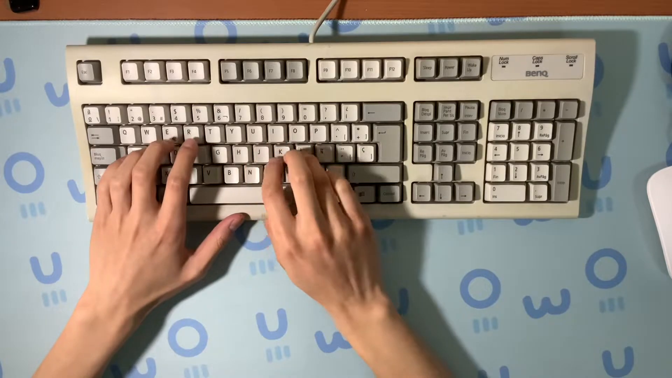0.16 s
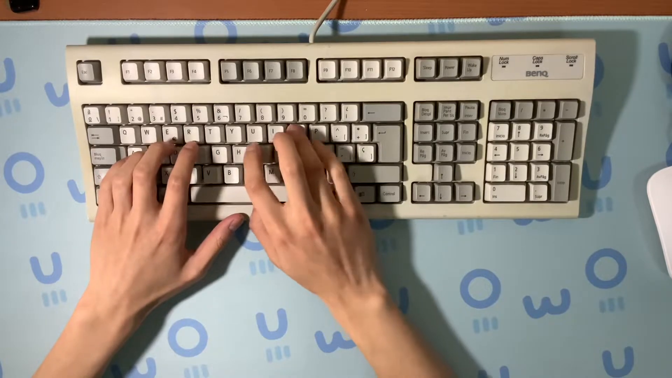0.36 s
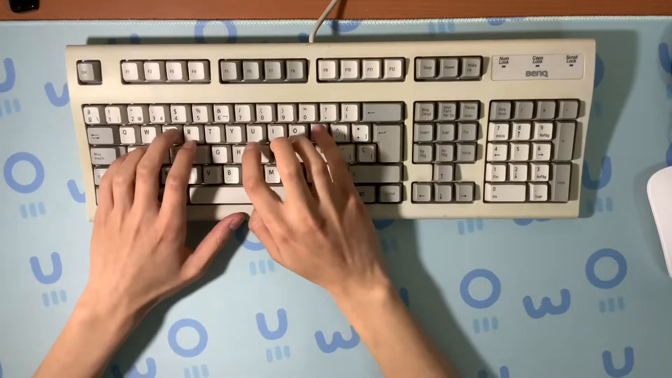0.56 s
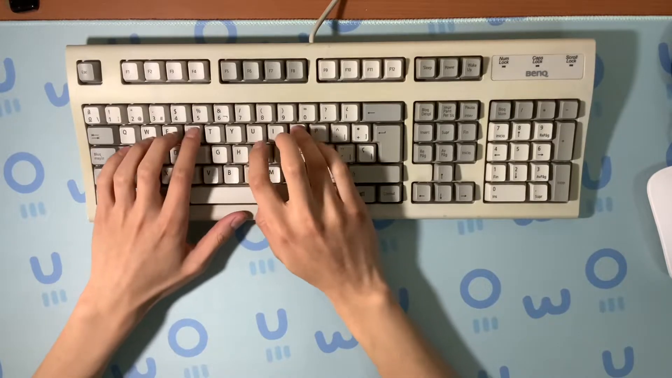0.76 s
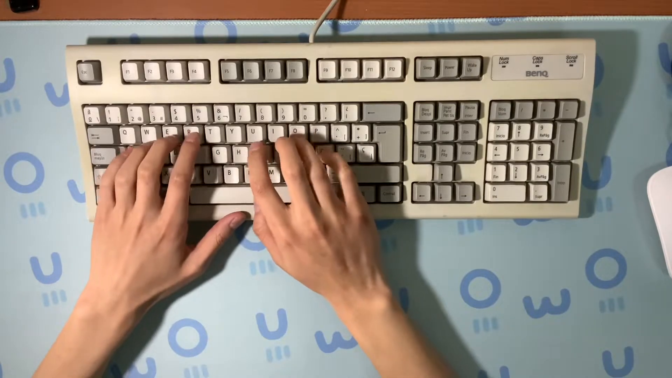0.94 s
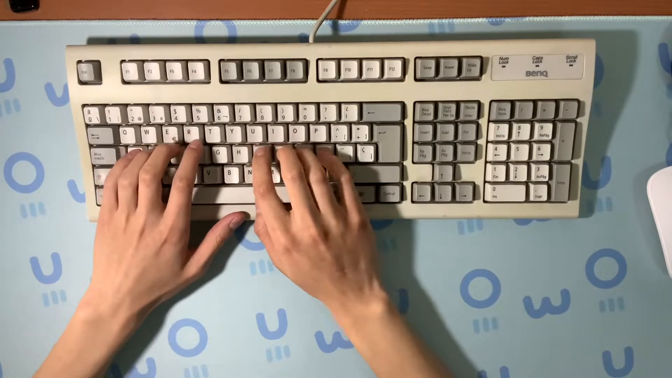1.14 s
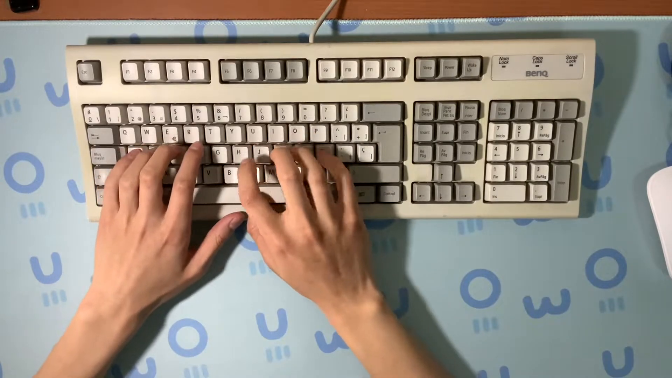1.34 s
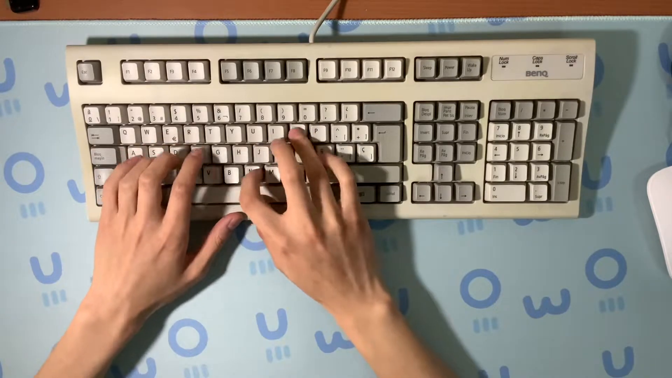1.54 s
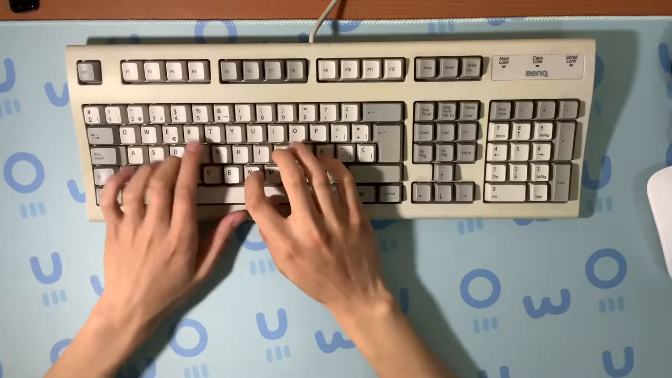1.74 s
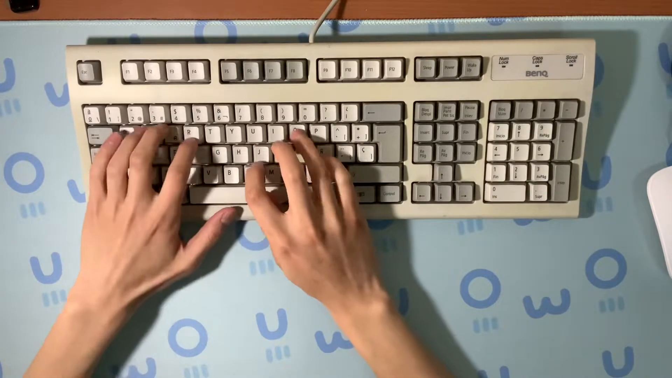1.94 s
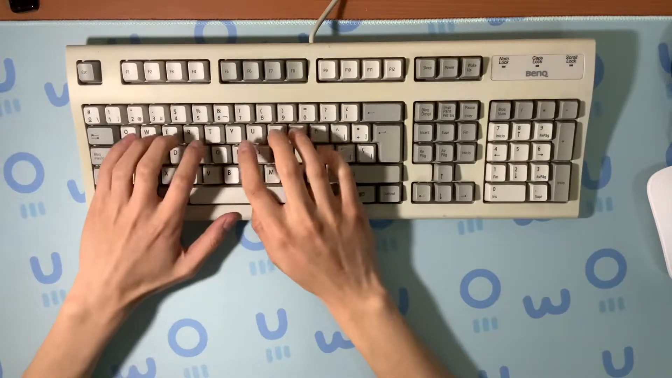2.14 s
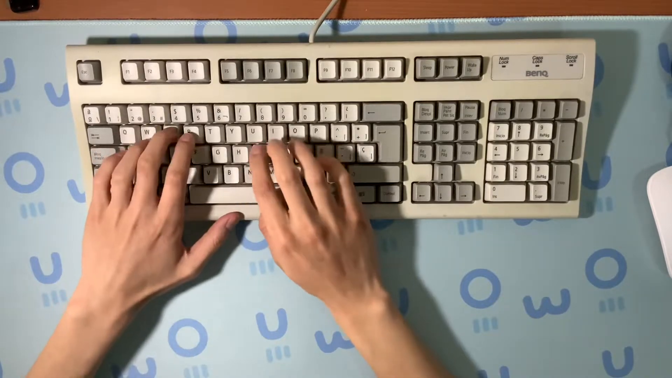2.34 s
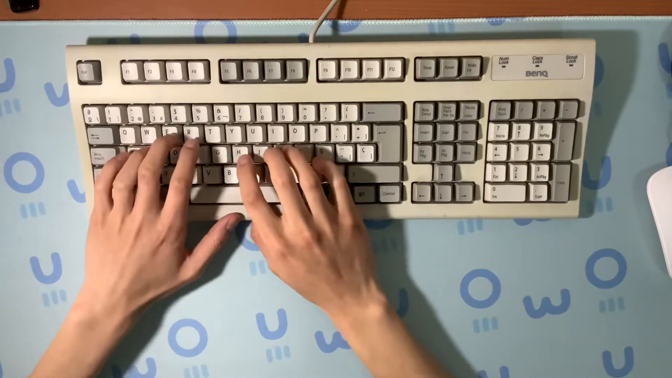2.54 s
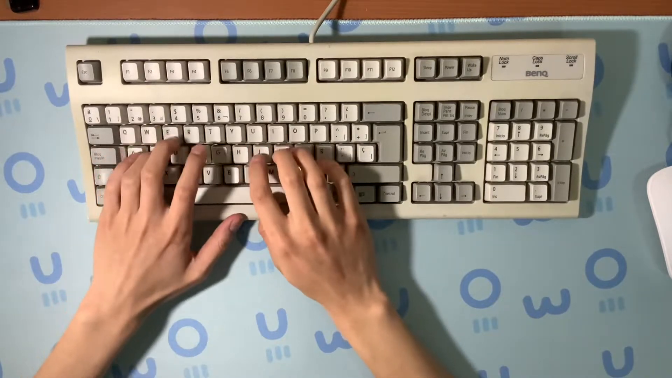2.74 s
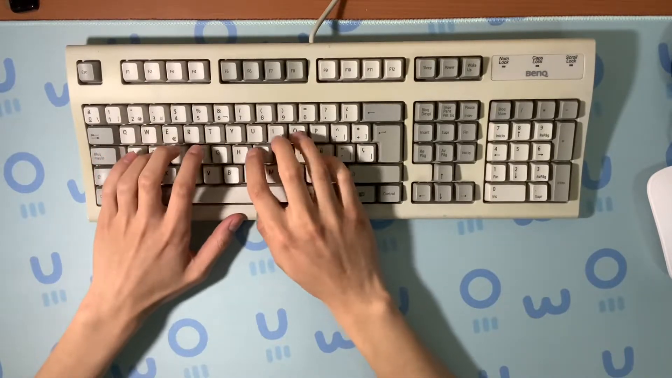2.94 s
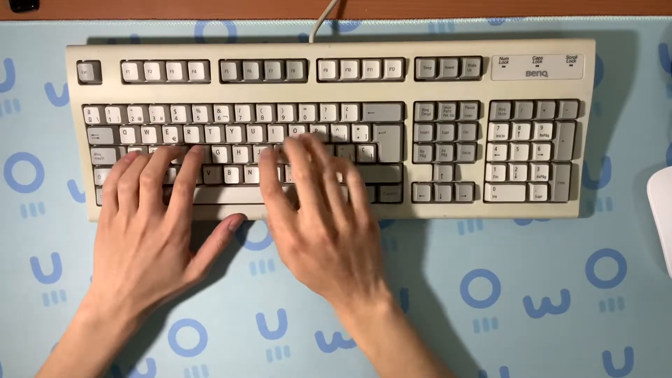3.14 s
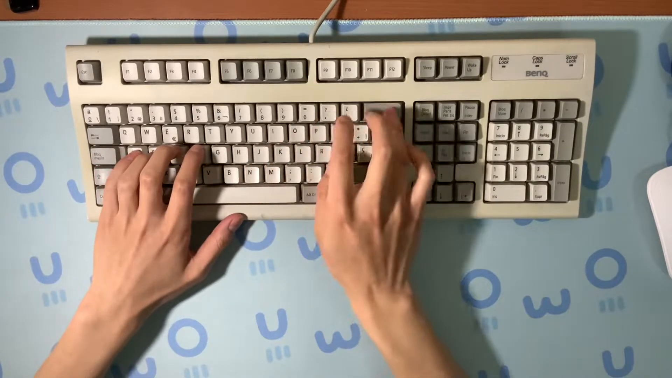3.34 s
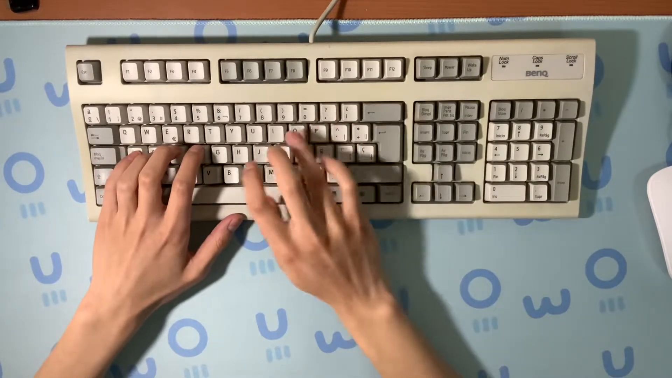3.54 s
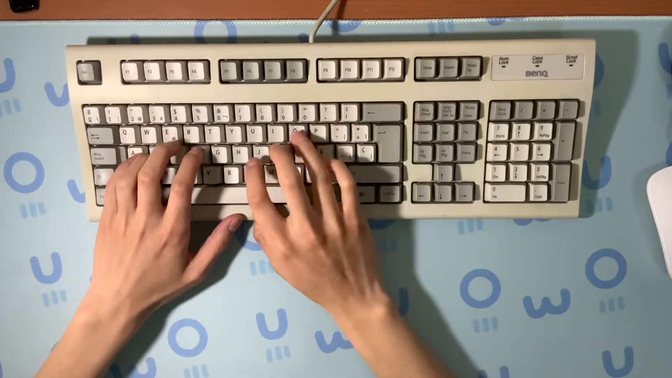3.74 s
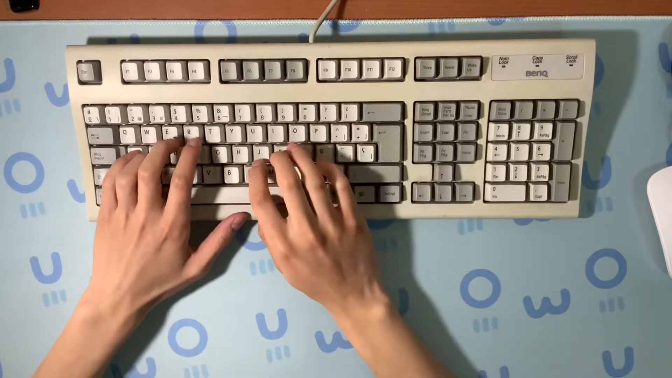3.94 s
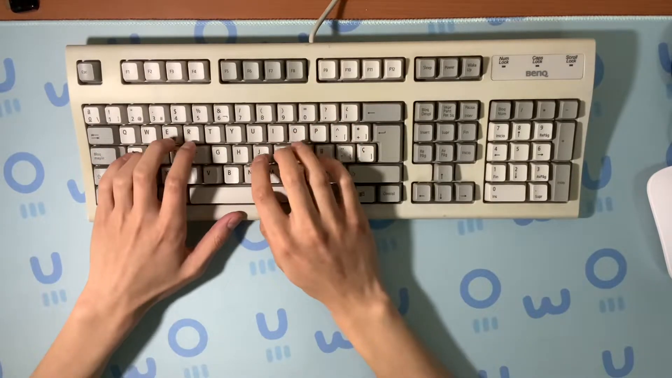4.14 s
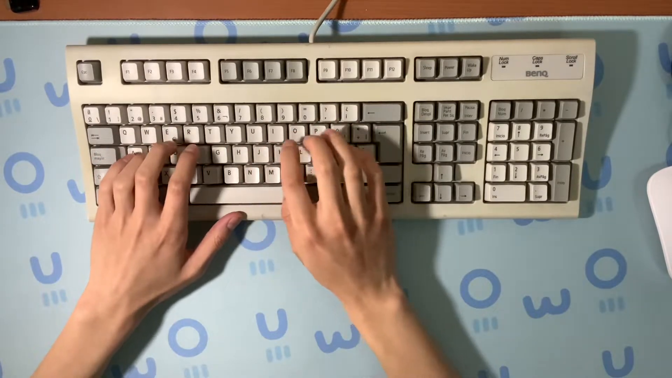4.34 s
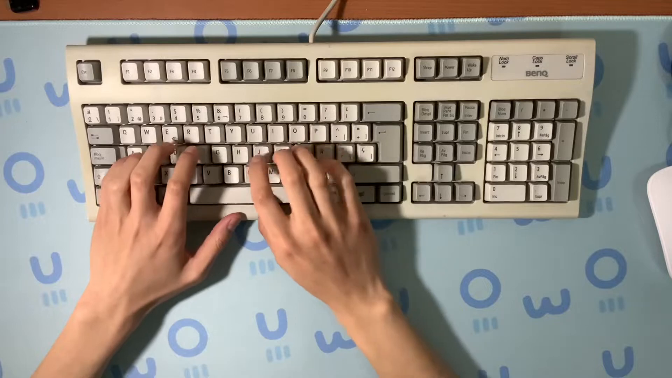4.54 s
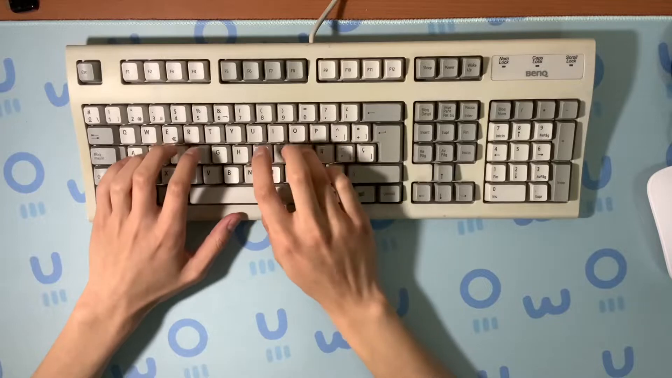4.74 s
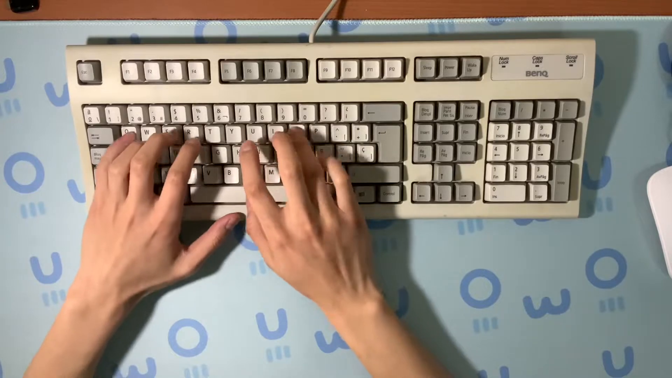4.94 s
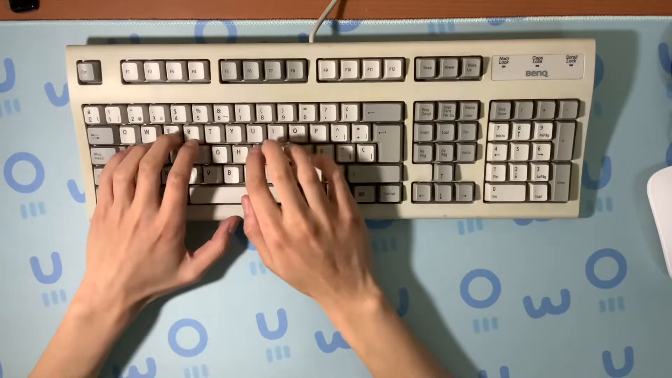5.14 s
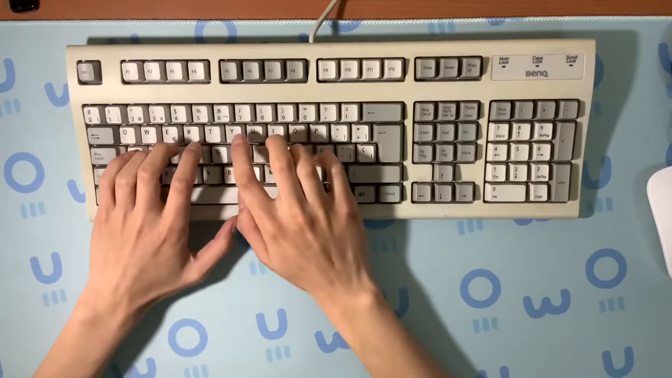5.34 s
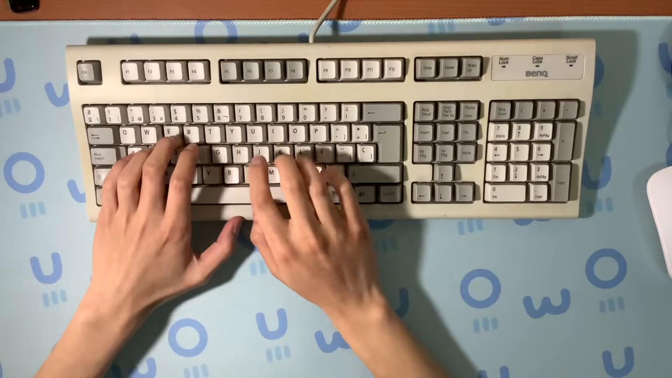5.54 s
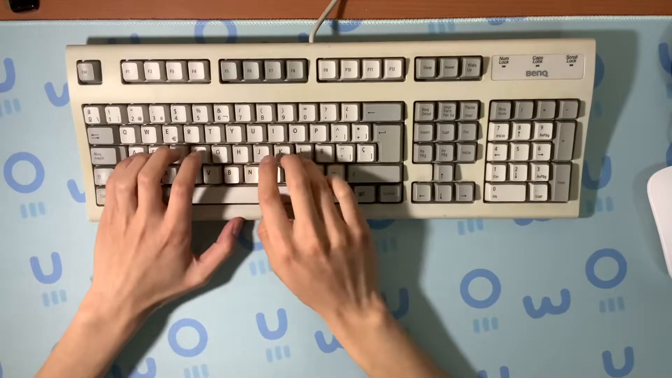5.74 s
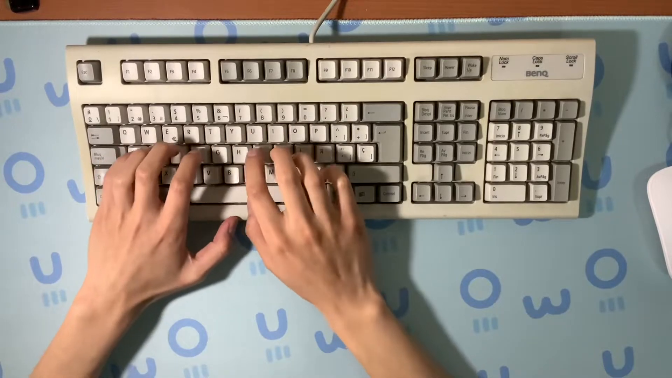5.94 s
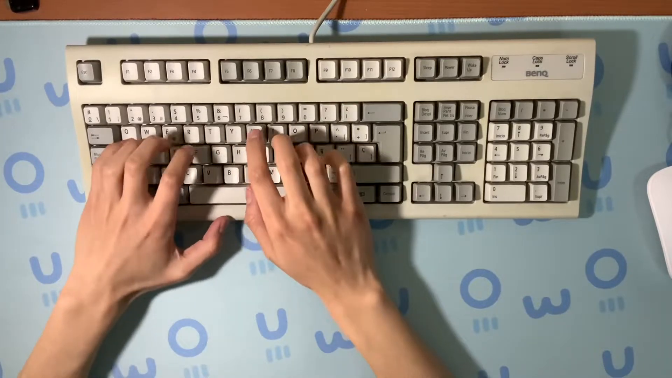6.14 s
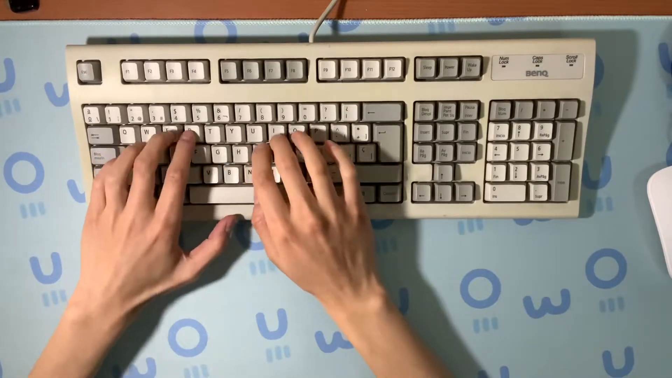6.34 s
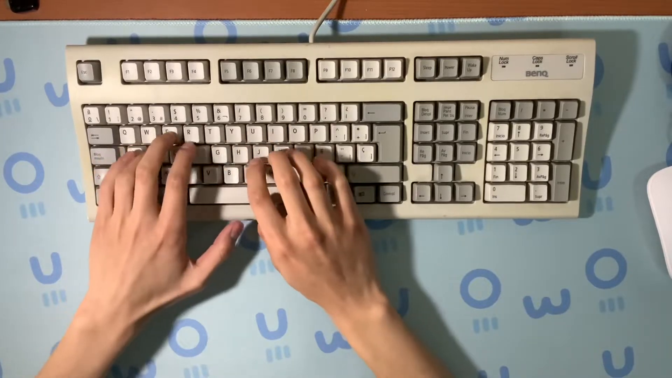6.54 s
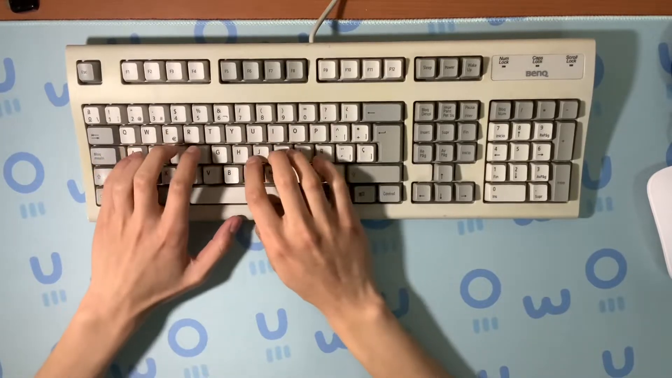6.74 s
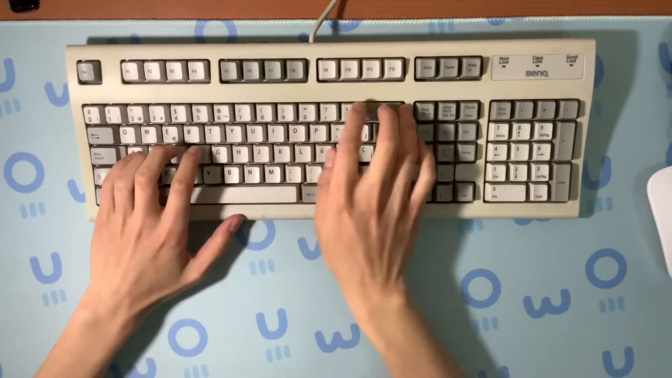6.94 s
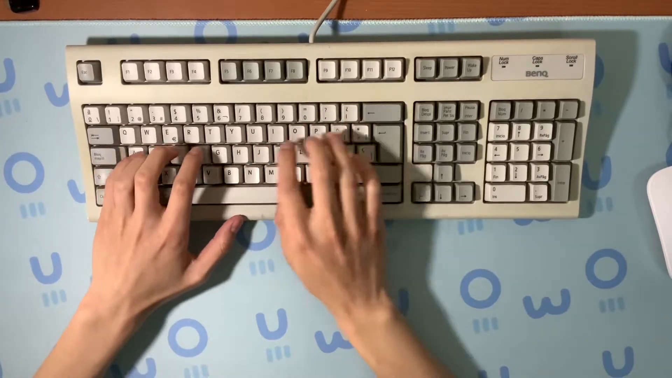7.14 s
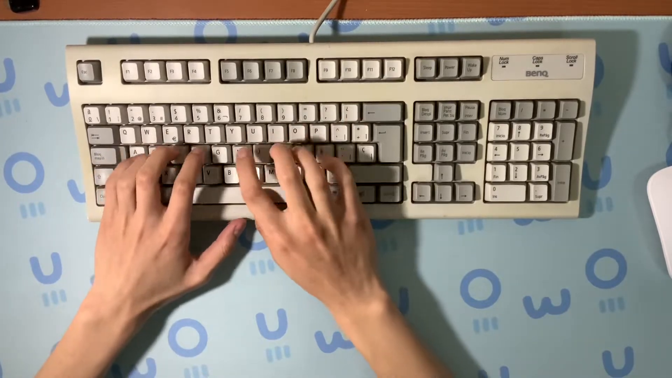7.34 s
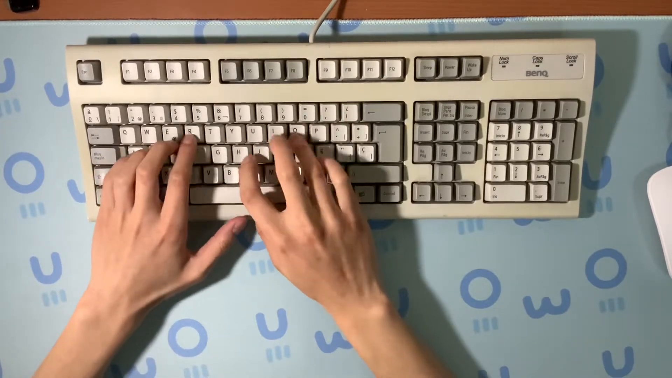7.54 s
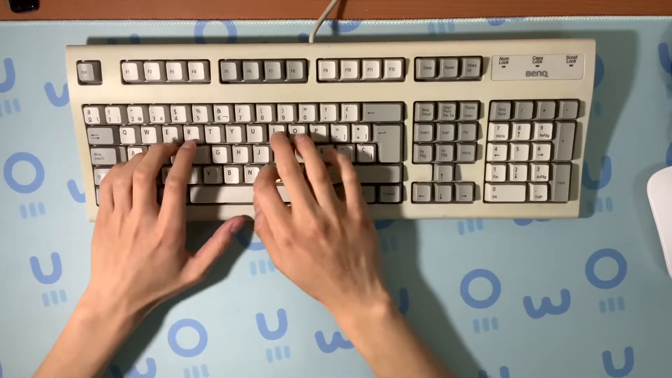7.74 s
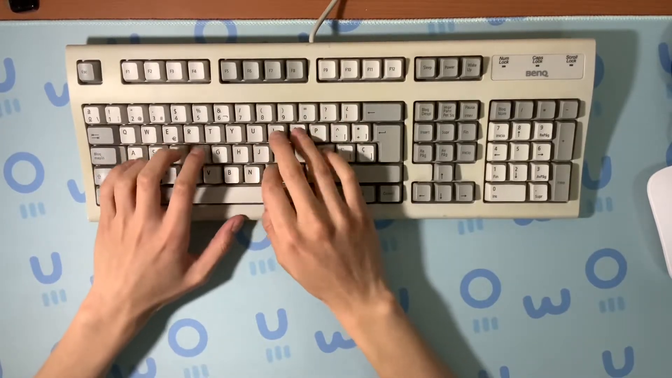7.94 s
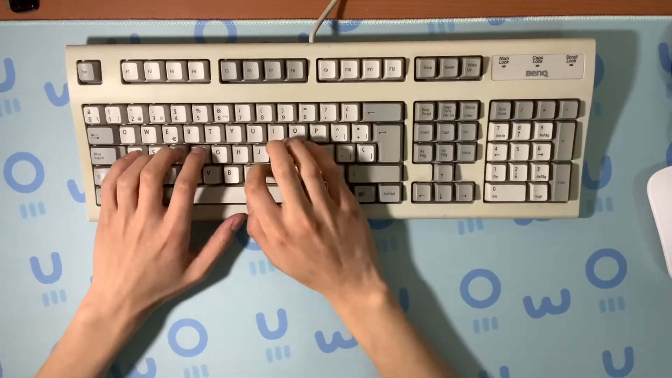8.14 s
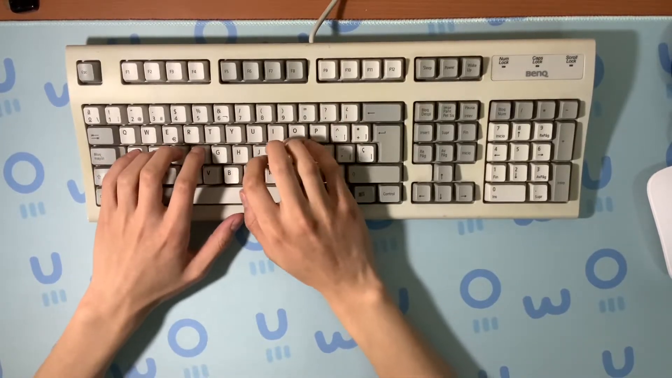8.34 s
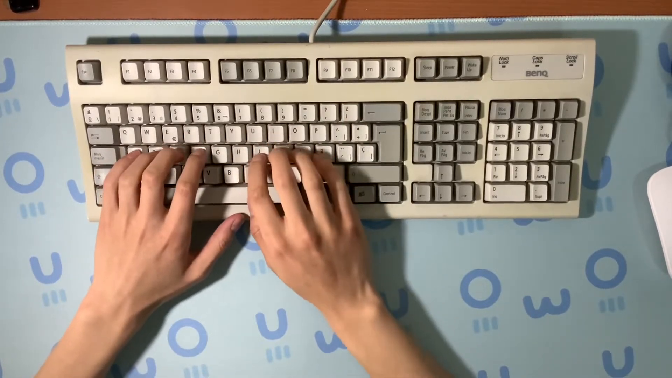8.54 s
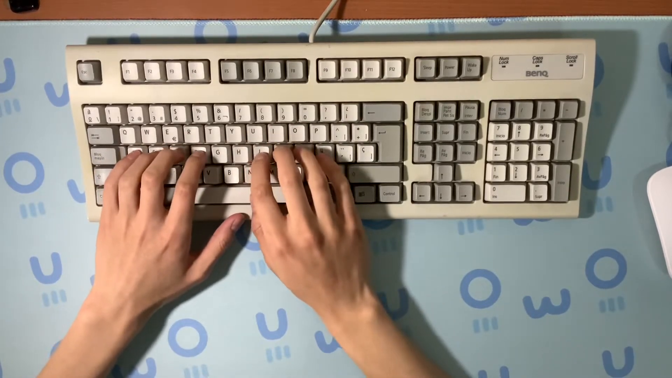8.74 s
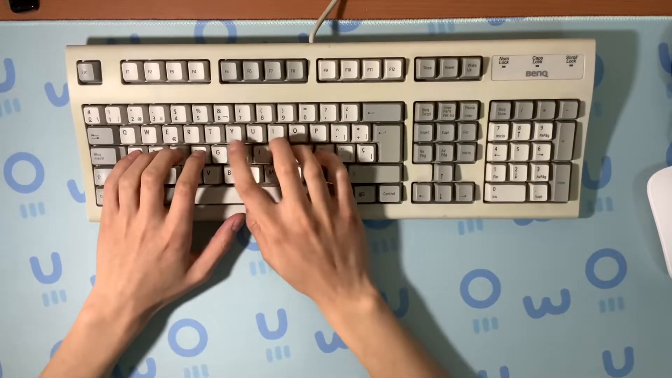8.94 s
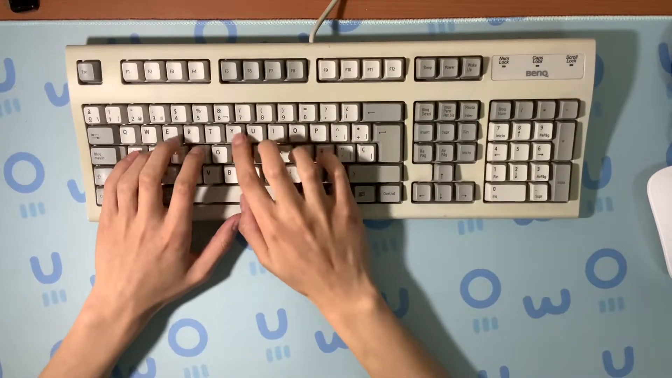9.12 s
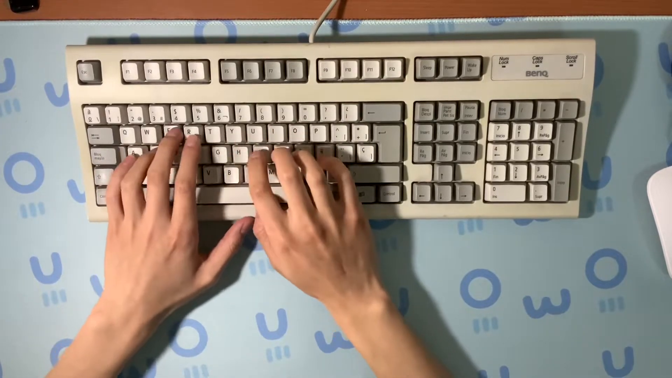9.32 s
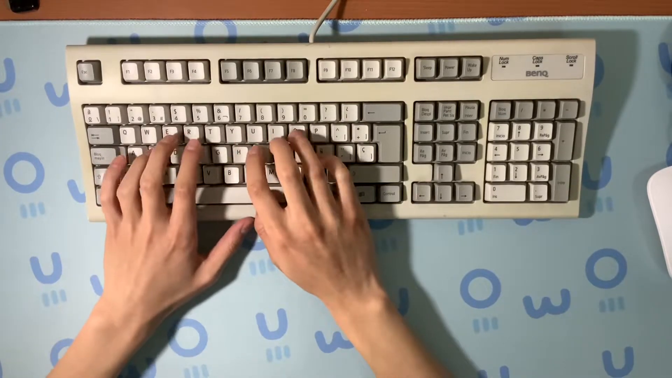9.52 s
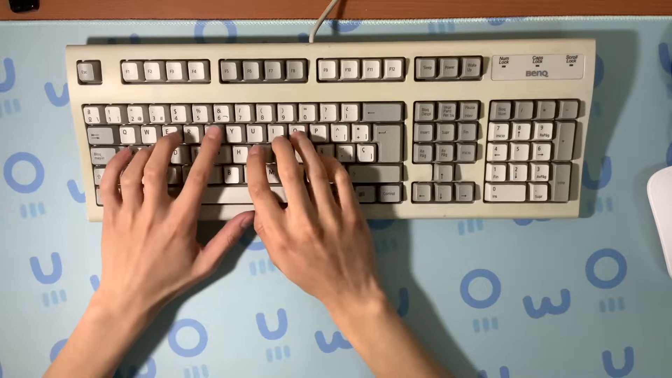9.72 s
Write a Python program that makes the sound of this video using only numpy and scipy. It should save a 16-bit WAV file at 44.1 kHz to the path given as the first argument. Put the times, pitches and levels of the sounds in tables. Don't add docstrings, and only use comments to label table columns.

```python
import sys
import numpy as np
from scipy import signal
from scipy.fft import rfft, irfft, next_fast_len
from scipy.io import wavfile
from scipy.ndimage import uniform_filter1d

SR = 44100
rng = np.random.default_rng(int(sys.argv[2]) if len(sys.argv) > 2 else 0)


def gain_from_db(level_db):
    decades = np.asarray(level_db, float) / 20
    return 10 ** decades


def dump_mix(stems):
    frames = np.atleast_2d(stems).T
    limited = np.clip(frames, -1, 1)
    pcm = np.round(limited * 32767).astype(np.int16)
    wavfile.write(sys.argv[1], SR, pcm)


N = 431298
SPAN, BURST, RUNUP = 4096, 1024, 600


def unit(x):
    return x / np.sqrt(np.mean(x ** 2) + 1e-20)


def along(points, hz):
    f, v = np.transpose(points)
    return np.interp(np.log(hz + 1), np.log(f + 1), v)


def filtered(x, response):
    m = next_fast_len(N + SR // 2)
    return irfft(rfft(x, m) * response(np.fft.rfftfreq(m, 1 / SR)), m)[..., :N]


def impulses(t, strength):
    force = np.zeros(N)
    force[np.round(t * SR).astype(int)] = strength
    return force


def hush():
    # f/Hz, level/dB per Hz
    air = [(25, -10), (80, 0), (300, -24), (2400, -26), (16000, -34)]
    return gain_from_db(-72) * unit(filtered(rng.standard_normal((2, N)), lambda hz: gain_from_db(along(air, hz))))


def contacts():
    # t/s, leaf/dB, delay to the bottom/ms, case/dB, cap/dB
    presses = [(0.482, -25.5, 10.3, -48.5, -36), (0.588, -33, 6.7, -39.5, -44),
               (0.657, -28.5, 10, -43, -56), (0.744, -34.5, 4.3, -33.5, -37),
               (0.93, -26.5, 9.4, -41.5, -33.5), (1.409, -34.5, 5.6, -37, -39.5),
               (1.926, -27.5, 14.6, -37, -34), (2.093, -27, 10, -45.5, -33.5),
               (2.201, -25.5, 9.1, -34.5, -40.5), (2.39, -27, 9.5, -51, -36),
               (2.546, -26, 6, -35, -28), (2.591, -32, 6.1, -34, -37.5),
               (2.677, -30.5, 5.2, -37.5, -55), (2.948, -25.0, 12.8, -36.5, -36),
               (3.092, -28, 10, -53.5, -40.5), (3.788, -33, 4.7, -33.5, -35),
               (4.664, -25, 8.3, -34, -60), (4.923, -23, 8.6, -35, -37), (5.011, -22, 6.1, -30, -31.5),
                    (5.122, -33, 5.5, -35.5, -37.5), (5.569, -23.5, 8, -37, -33), (5.696, -29, 7, -52, -61),
                    (5.943, -24.5, 9, -41, -32), (6.217, -32.5, 6.7, -38, -43),
                    (6.298, -27.5, 7.7, -39, -37), (6.415, -33.5, 7.1, -36.5, -41.5),
                    (6.529, -30, 8.6, -46, -31.5), (7.141, -30, 5.1, -71, -41), (7.994, -22, 9.2, -41, -51),
                    (8.131, -28, 11, -44.5, -35.5), (8.897, -43.5, 21, -53.5, -53),
                    (9.096, -21, 14, -47, -27), (9.113, -19.5, 5.6, -43, -42),
                    (9.187, -24.0, 7.4, -43, -37), (9.258, -32.5, 6.2, -35.5, -47),
                    (9.407, -28, 6.9, -52.5, -40.5), (9.451, -30, 7, -69, -40.5),
                    (9.543, -31.5, 2.3, -38, -46)]
    # t/s, leaf/dB, cap/dB
    ticks = [
        (.278, -33, -35),
        (0.427, -51.5, -52),
        (3.311, -28, -37.5),
        (3.701, -30, -26),
             (0.338, -34, -32.5), (0.352, -15.5, -24.5), (0.788, -27.5, -36), (0.814, -21, -32.5),
                   (0.837, -33, -39), (0.841, -17, -25.5), (0.883, -22.5, -32.5), (1.521, -31.5, -41.5),
                   (1.555, -18, -22.5), (1.607, -33, -41.5), (1.639, -22.5, -31), (1.664, -27, -39.5),
                   (1.886, -51, -36.5), (1.972, -31, -37.5), (2.013, -26.5, -33), (2.024, -26, -33),
                   (2.169, -29.5, -35.5), (2.3, -29, -36.5), (2.443, -24.5, -35), (2.485, -16.5, -25.5),
                   (2.522, -38, -33), (2.748, -31.5, -40), (2.793, -29, -36), (2.804, -23, -33.5),
                   (2.837, -40, -32), (2.846, -35, -36.5),
             (3.234, -23.5, -30.5), (3.302, -29, -32.5), (3.558, -29.5, -38), (3.608, -27.5, -35.5),
                    (3.643, -19, -24), (3.673, -23, -32), (3.685, -35, -40.5), (3.922, -27, -32.5),
                    (4.542, -30, -35.5), (4.552, -18.5, -28), (4.573, -22.5, -27.5), (4.656, -39, -26),
                    (4.911, -27.5, -30.5), (4.939, -21.5, -31), (4.998, -26.5, -30.5), (5.107, -27.5, -35),
                    (5.181, -23, -31.5), (5.196, -15, -22.5), (5.277, -33.5, -30), (5.836, -32, -33),
                    (5.868, -24, -32.5), (5.879, -24, -28.5), (6.365, -29, -38.5), (6.511, -26, -40),
                    (6.57, -31, -35.5), (6.628, -44.5, -46.5),
             (6.92, -26, -37.5), (6.933, -26.5, -34.5), (7.187, -23.5, -34), (7.218, -16.5, -24.5),
                  (7.281, -25.5, -34), (7.396, -25.5, -34), (7.416, -32.5, -37), (7.537, -28.5, -32.5),
                  (7.581, -26.5, -38.5), (7.591, -33.5, -35.5), (7.602, -23, -32), (7.626, -29, -36.5),
                  (7.749, -28, -29.5), (7.822, -33, -35.5), (7.901, -28.5, -37.5), (8.019, -14, -24.5),
                  (8.072, -33.5, -35.5), (8.081, -25.5, -33.5), (8.09, -38, -42), (9.201, -28, -32.5),
                  (9.711, -31, -34.5)]
    # t/s, leaf/dB
    snicks = [(0.0257, -40), (0.0567, -36), (0.2874, -28), (0.34, -30), (0.4525, -36.5),
              (0.4948, -34.5), (0.579, -38), (0.6489, -37.5), (0.8346, -21.5), (1.4571, -30),
              (1.5478, -19), (1.6224, -25), (1.6283, -39), (1.7912, -26.5), (1.8857, -34),
              (1.9324, -30.5), (1.9392, -33.5), (2.3756, -46.5), (2.3815, -39), (2.4787, -23),
              (2.5218, -28), (2.5563, -24.5), (2.6689, -45), (2.7341, -40), (2.8344, -21.5),
              (2.8838, -36.5), (2.9415, -45), (3.2477, -25.5), (3.2952, -42), (3.3035, -32.5),
              (3.3393, -31.5), (3.4145, -26.5), (3.6372, -23.5), (3.7404, -29.5), (4.4467, -33),
              (4.5668, -23), (4.6104, -34.5), (4.644, -38.5), (4.6574, -28.5), (4.9279, -27),
              (5.0808, -41.5), (5.0988, -43),
              (5.1878, -29.5), (5.2666, -28), (5.4576, -50), (5.6349, -49), (5.6874, -38),
                   (5.7537, -26), (5.8429, -26), (5.9309, -28), (5.953, -28), (6.199, -29), (6.2139, -30),
                   (6.5375, -27.5), (6.9945, -41), (6.9996, -38), (7.2115, -26), (7.3049, -29),
                   (7.697, -33), (7.7287, -31.5), (7.734, -26), (7.8016, -43.5), (7.8853, -39),
                   (7.8934, -45), (7.9121, -24.5), (8.0157, -22), (8.1254, -37.5), (8.9991, -30.5),
                   (9.0943, -23.5), (9.1077, -23.5), (9.194, -38), (9.2457, -47), (9.3081, -35),
                   (9.325, -36), (9.391, -46), (9.5347, -31)]
    # t/s, leaf/dB, case/dB
    blows = [(0.002, -33, -27.5), (0.07, -34.5, -44), (0.076, -36, -43), (0.118, -30.5, -32.5),
             (0.198, -31.5, -36.5), (0.288, -37.5, -32), (0.329, -25.5, -43), (0.394, -25, -41.5),
             (0.459, -41.5, -37), (0.605, -27.5, -41.5), (0.71, -38, -44.5), (0.724, -38, -50.5),
             (1.39, -30.5, -35), (1.462, -34, -36.5), (1.739, -27.5, -34.5), (1.795, -36, -33.5),
             (1.879, -33, -44.5), (1.965, -27, -37.5), (2.067, -26, -33), (2.286, -33.5, -50.5),
             (2.301, -40, -40.5), (2.758, -36, -54), (2.971, -43, -29.5), (3.242, -31.5, -49),
             (3.248, -36, -25.5), (3.349, -31.5, -27), (3.419, -22.5, -31.5), (3.551, -25, -34.5),
             (3.709, -22, -33), (3.745, -37.5, -36.5), (3.933, -42, -48), (4.434, -46, -42),
                    (4.455, -35, -30), (4.749, -33.5, -39), (4.798, -36, -47.5), (4.813, -28, -31),
                    (4.876, -33, -43), (5.285, -27.5, -38.5), (5.441, -43, -42.5), (5.466, -36, -35),
                    (5.473, -38.5, -35), (5.585, -50, -61), (5.652, -38, -50.5), (5.738, -48, -44),
                    (5.759, -39.5, -36.5), (5.81, -35.0, -41), (6.09, -32, -35.5), (6.166, -38, -38.5),
                    (6.187, -35, -31), (6.256, -34, -41), (6.275, -31.5, -43),
             (6.319, -32.5, -35.5), (6.441, -28.5, -41), (6.45, -40, -32.5), (7.019, -18, -27.5),
                  (7.292, -23, -32.5), (7.311, -41.5, -31.5), (7.388, -29.5, -39), (7.461, -26.5, -32),
                  (7.521, -33.5, -38), (7.671, -25, -37), (7.705, -45.5, -35), (7.74, -26, -34),
                  (7.81, -31.5, -33.5), (7.913, -39, -29), (8.993, -33, -44), (9.001, -55, -24.5),
                  (9.229, -48, -44.5), (9.319, -42.5, -33), (9.528, -42, -46), (9.716, -32, -65)]
    # t/s, leaf/dB, case/dB, cap/dB
    touches = [(1.06, -43.5, -60, -49.5), (1.25, -65, -58, -53), (1.307, -81.0, -65, -56),
               (1.326, -40, -89, -49), (3.403, -40, -57, -63), (3.892, -51, -61, -53),
               (6.08, -39, -57, -45), (6.683, -41.5, -62, -49), (7.608, -23, -68, -38),
               (8.312, -85.5, -74, -61.5), (8.34, -81, -70, -58.5), (8.437, -70, -58.5, -57),
               (8.466, -55.5, -66, -53.5), (8.956, -69, -100, -52), (9.646, -75, -70, -55)]

    found = []
    for t, leaf, ms, case, cap in presses:
        found.append((t, leaf - 7.5, leaf, leaf - 22.5))
        found.append((t + ms / 1000, cap, leaf - 15.5, case))
    for t, leaf, cap in ticks:
        found.append((t, cap, leaf, leaf - 20))
    for t, db in snicks:
        found.append((t + 0.0001, db - 12.5, db - 2, db - 24))
    for t, leaf, case in blows:
        cap = -34 + 0.47 * (leaf + 30) + 0.27 * (case + 40)
        found.append((t, cap, leaf, case))
    for t, leaf, case, cap in touches:
        found.append((t, cap, leaf, case))
    return sorted(found)


KEYS = contacts()


def modes(table, hz, scatter_db, detune):
    fc, width, db = np.transpose(table)[:, :, None, None]
    luck = rng.standard_normal((len(KEYS), 3, len(table))).T[..., None]
    fc = fc * (1 + detune * luck[:, 1])
    gain = gain_from_db(db + scatter_db * luck[:, 0]) * np.sign(luck[:, 2])
    return sum(g * 1j * hz * w / (c * c - hz * hz + 1j * hz * w) for c, w, g in zip(fc, width, gain))


def rattle(width_ms, spiky_db, travel_db):
    cap_db = np.array(KEYS)[:, 1:2]
    ms = (np.arange(BURST) - RUNUP) * 1000 / SR / gain_from_db(0.36 * (cap_db + 37.5))
    ms = np.where(ms < 0, 1.5 * ms, ms)
    luck = rng.standard_normal((len(KEYS), 3, BURST)).swapaxes(0, 1)
    grains = gain_from_db(spiky_db * 4 * uniform_filter1d(luck[2], size=16))
    clump = np.exp(-(ms / width_ms) ** 2)
    travel = gain_from_db(travel_db) * np.hanning(BURST) / (np.exp(-ms / 1.6) + np.exp(ms / 9))
    return rfft(grains * luck[:2] * (clump + travel), SPAN)


def placed(spectra, db):
    wave = irfft(spectra, SPAN) * np.hanning(2 * SPAN)[SPAN:]
    peak = np.sqrt(uniform_filter1d(wave ** 2, size=90).max(axis=2)[0])
    wave *= gain_from_db(db)[:, None] / peak[:, None]
    start = np.round(np.array(KEYS)[:, :1] * SR).astype(int)
    at = (start + np.arange(SPAN)).ravel()
    return np.array([np.bincount(at, w.ravel(), N + SPAN)[RUNUP:N + RUNUP] for w in wave])


def keys():
    # f/Hz, level/dB per Hz
    clack_colour = [(710, -42), (1200, -6), (2290, -6.5), (2620, -5.5), (5570, -0.5), (7660, -2.5),
                    (10000, -11), (13000, -42.5)]
    # f/Hz, level/dB
    sizzle_colour = [(7000, -18.5), (9000, -3), (12000, 4.5), (15500, 3.5), (16000, -35), (16800, -30.5)]
    # f/Hz, width/Hz, level/dB
    cap_modes = [(1650, 38, 2), (2033, 120, -1), (2315, 110, 2.5), (2938, 270, -5.5), (3860, 150, -30)]
    # f/Hz, width/Hz, level/dB
    case_modes = [(300, 13, -16), (402.5, 12, -9.5), (609, 10, -21), (721, 30, -12), (810, 41, -11.5),
                  (900, 13.4, 6.5), (1020, 82, -2.5), (1213, 24, -10.5), (1360, 58, -14)]
    hz = np.fft.rfftfreq(SPAN, 1 / SR)
    t, cap_db, leaf_db, case_db = np.transpose(KEYS)

    cap = gain_from_db(along(clack_colour, hz)) * (0.19 + modes(cap_modes, hz, scatter_db=0.0, detune=0.0043))
    ripple = uniform_filter1d(rng.standard_normal(cap.shape), size=70)
    cap *= gain_from_db(2.2 * unit(ripple))
    cap /= 1 + (hz / (3000 * gain_from_db(cap_db + 55))[:, None]) ** 2
    clack = placed(rattle(width_ms=3.27, spiky_db=8.0, travel_db=-5.5) * cap, cap_db + 1.5)

    leaf = gain_from_db(along(sizzle_colour, hz))
    sizzle = placed(rattle(width_ms=1.98, spiky_db=5.5, travel_db=-25) * leaf, leaf_db + 0.6)

    blow = rattle(width_ms=0.63, spiky_db=1.0, travel_db=-31.5)
    low_cut = (hz / (hz - 450j)) ** 2
    case = low_cut * modes(case_modes, hz, scatter_db=4.5, detune=0.013)
    knock = placed(blow * case, case_db + 2.5)
    return clack + sizzle, knock


def ringing(table, f):
    return sum((-1) ** k * gain_from_db(db) * 1j * f * w / (c * c - f * f + 1j * f * w)
               for k, (c, w, db) in enumerate(table))


def desk():
    # t/s, level/dB
    pushes = [(0.146, -41.5), (0.31, -42), (0.605, -43.5), (1.815, -42), (2.07, -40.5), (2.604, -40.5),
              (3.581, -46), (3.801, -40.5), (4.463, -41), (4.671, -40), (4.827, -38), (4.935, -58.5),
              (5.02, -39.5), (5.135, -40), (5.475, -40.5), (5.585, -41.5), (6.108, -42.5), (6.291, -41),
              (6.432, -37), (7.308, -54), (7.412, -44), (7.751, -45.5), (7.82, -44), (9.27, -43),
              (9.557, -43.5)]
    # t/s, level/dB
    thuds = [(0.123, -51), (2.068, -33), (2.596, -48), (3.796, -37.5), (4.816, -52), (5.127, -41),
             (5.471, -39), (6.284, -44), (6.324, -45), (6.448, -48), (7.706, -43.5), (9.001, -50)]
    # f/Hz, width/Hz, level/dB
    top_modes = [(53, 25, -12), (107.1, 4.8, -2), (129.5, 8, -7.5), (179, 9.8, -9), (262.8, 59, -13)]
    # f/Hz, width/Hz, level/dB
    plate_modes = [(225, 44, -1), (284, 35, 1.5), (417, 29, 4), (513, 49, -11.5)]
    t, cap_db, leaf_db, case_db = np.transpose(KEYS)
    force = impulses(t, gain_from_db(0.4 * case_db + 29.5) * rng.standard_normal(len(t)))
    t, db = np.transpose(pushes)
    force[np.round(t * SR).astype(int)] = gain_from_db(db + 63.0)
    t, db = np.transpose(thuds)
    thud = impulses(t, gain_from_db(db + 46))
    top = filtered(force, lambda f: ringing(top_modes, f) * f / (f - 40j) / (1 + 1j * f / 220) ** 3)
    plate = filtered(thud, lambda f: ringing(plate_modes, f) / (1 + 1j * f / 700) ** 2)
    low = top + plate
    return np.array([low, np.roll(low, SR // 80)])


def tail(x, decays, wait):
    hz, t, z = signal.stft(x[0], SR, nperseg=256, noverlap=192)
    keep = gain_from_db(-120 * t[1] / along(decays, hz))
    mixed = uniform_filter1d(np.abs(z) ** 2, size=7, axis=0)
    stored = np.array([signal.lfilter([0] * wait + [1 - k], [1, -k], p) for k, p in zip(keep, mixed)])
    fresh = signal.stft(rng.standard_normal(x.shape), SR, nperseg=256, noverlap=192)[2]
    fresh /= np.sqrt(np.mean(np.abs(fresh) ** 2))
    return signal.istft(np.sqrt(stored) * fresh, SR, nperseg=256, noverlap=192)[1][:, :N]


def keyboard_scatter(heard):
    # f/Hz, t60/s
    body_decay = [(300, 0.074), (3000, 0.095), (12000, 0.027)]
    # f/Hz, level/dB
    body_colour = [(300, -9.5), (1500, -4), (4000, -3), (8000, -10), (14000, -8.5)]
    return filtered(tail(heard, body_decay, 2), lambda hz: gain_from_db(along(body_colour, hz)))


def room_walls(heard):
    # f/Hz, t60/s
    room_decay = [(300, 0.3), (3000, 0.35), (14000, 0.22)]
    # f/Hz, level/dB
    room_colour = [(300, -8.5), (2000, -5.5), (4500, -3.5), (8000, -6.5), (14000, -16)]
    return filtered(tail(heard, room_decay, 5), lambda hz: gain_from_db(along(room_colour, hz)))


def fingertip():
    # t/s, level/dB
    slide = [
        (8.29, -103),
        (8.35, -62),
        (8.44, -66),
        (8.5, -103),
    ]
    rub = filtered(rng.standard_normal((2, N)), lambda f: np.exp(-(np.log((f + 1) / 600) / .7) ** 2))
    return gain_from_db(np.interp(np.arange(N) / SR, *np.transpose(slide), -200, -200)) * unit(rub)


def ports(pair):
    # f/Hz, correlation
    alike = [(60, .97), (400, .8), (900, .95), (1400, .3), (2200, .85), (3000, .35), (8800, .3),
             (9500, .98)]
    # f/Hz, phase/rad
    lead = [(0, 0), (1030, .8), (1890, 6.1), (4050, 15.4), (5430, 25), (7490, 34.7), (10800, 40.8),
            (15200, 50.3)]
    # f/Hz, level/dB
    lean = [(50, -1.3), (200, -2.5), (700, 2), (1600, -1.5), (4400, 1.5), (12000, 0)]

    def blend(hz):
        angle = np.arccos(along(alike, hz)) / 2
        return np.array([np.cos(angle), np.sin(angle)])

    def spread(hz):
        half = gain_from_db(along(lean, hz) / 2) * np.exp(.5j * np.interp(hz, *np.transpose(lead)))
        return np.array([half, 1 / half])

    mid, side = filtered(pair, blend)
    return filtered(np.array([mid + side, mid - side]), spread)


def scene():
    caps, knock = keys()
    knock = np.roll(knock, int(.001 * SR), axis=1)
    heard = caps + gain_from_db(-4.5) * knock
    diffuse = keyboard_scatter(heard) + room_walls(heard)
    return ports(caps + knock + diffuse + desk() + fingertip() + hush())


def low_pass(x):
    return signal.sosfilt(signal.butter(12, 16960, fs=SR, output="sos"), x)


def record(dry):
    power = np.abs(uniform_filter1d(np.mean(dry ** 2, 0), size=1500))
    level_db = 10 * np.log10(power + 1e-12)
    gain_db = np.clip(.8 * (level_db + 60), -9, 0)
    banded = filtered(dry * gain_from_db(gain_db), lambda hz: 1 / (1 + (hz / 16650) ** 200))
    return low_pass(banded)


dry = scene()
out = record(dry)
dump_mix(out)
```